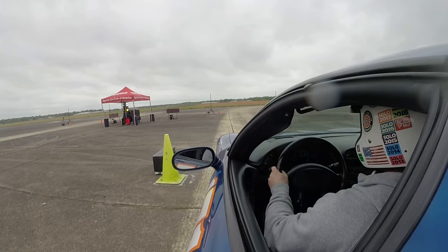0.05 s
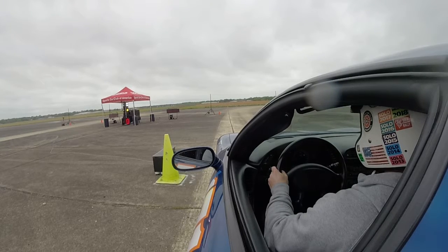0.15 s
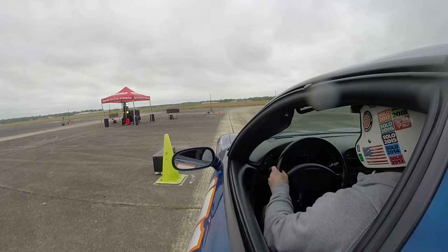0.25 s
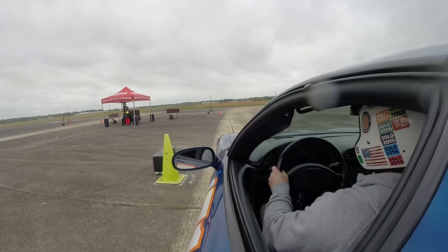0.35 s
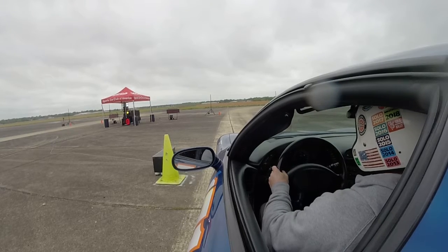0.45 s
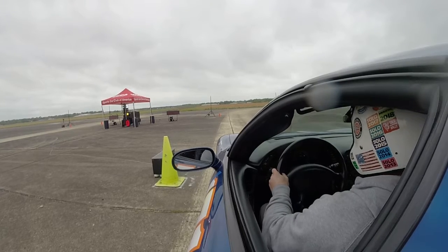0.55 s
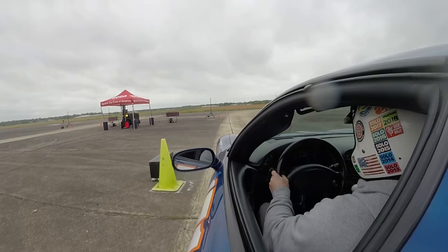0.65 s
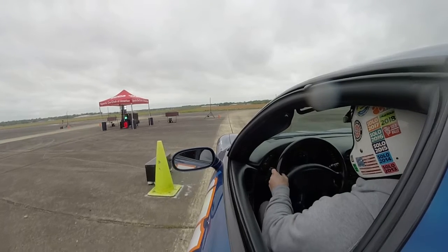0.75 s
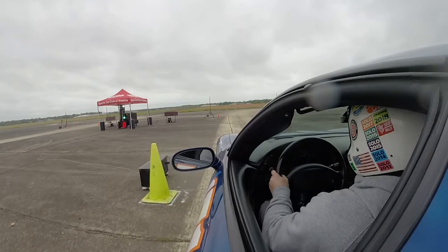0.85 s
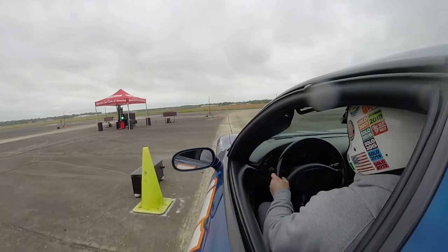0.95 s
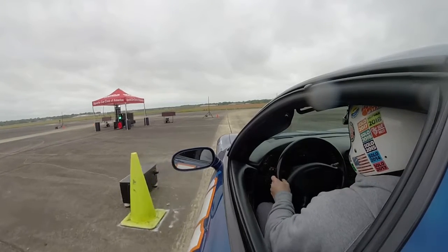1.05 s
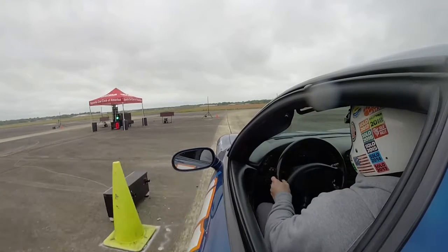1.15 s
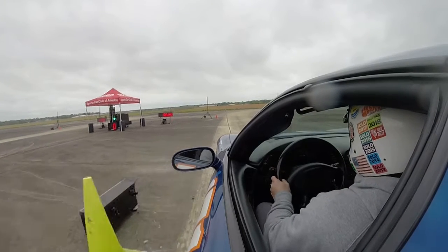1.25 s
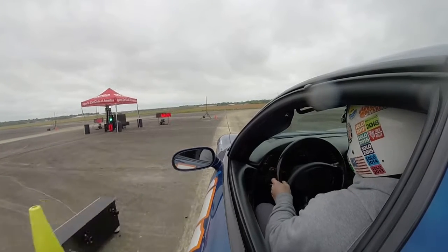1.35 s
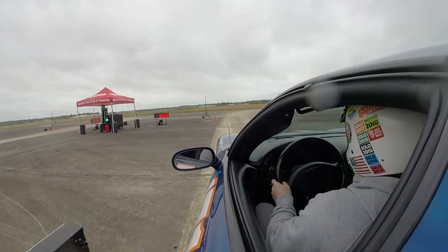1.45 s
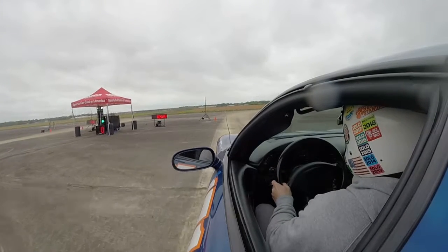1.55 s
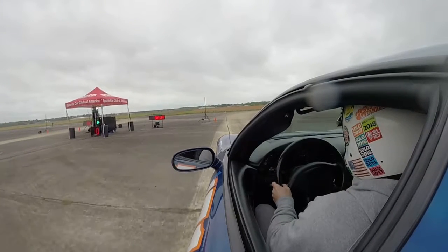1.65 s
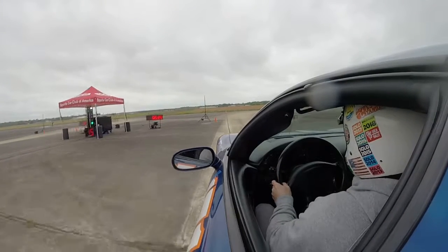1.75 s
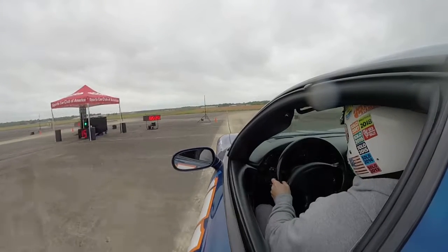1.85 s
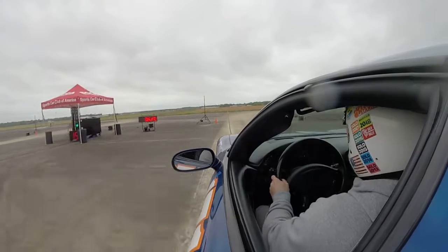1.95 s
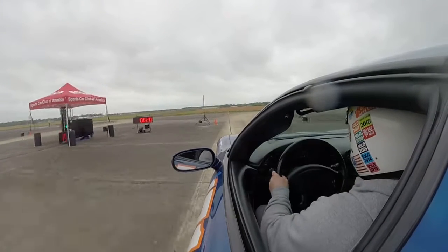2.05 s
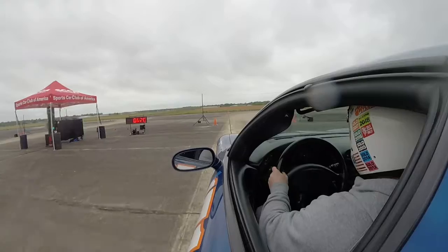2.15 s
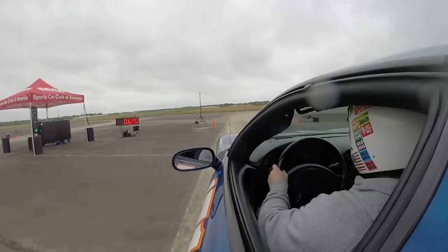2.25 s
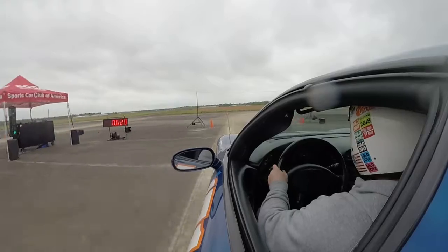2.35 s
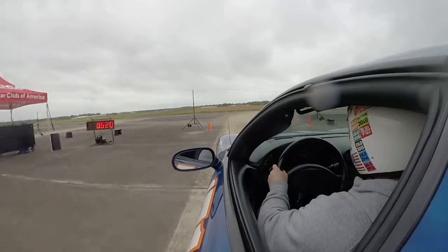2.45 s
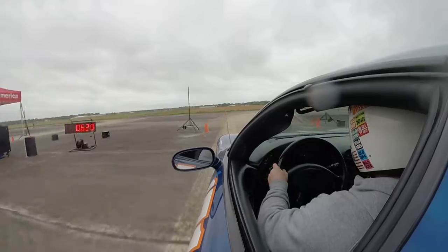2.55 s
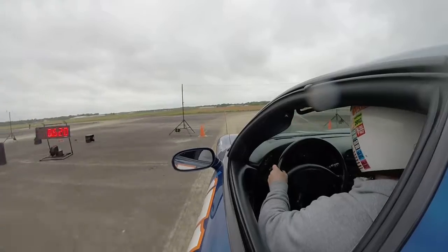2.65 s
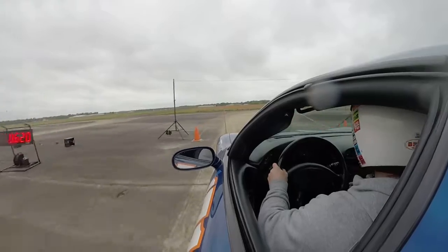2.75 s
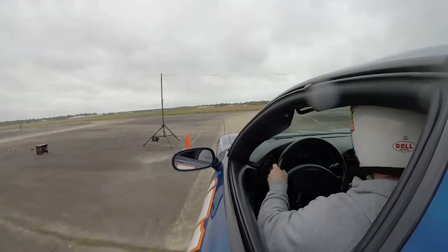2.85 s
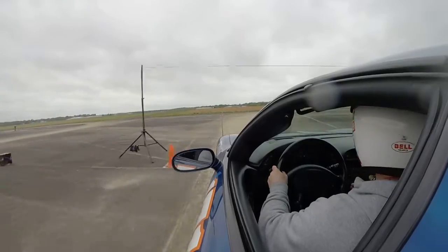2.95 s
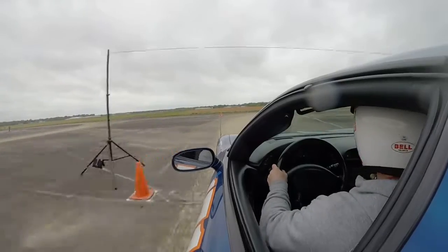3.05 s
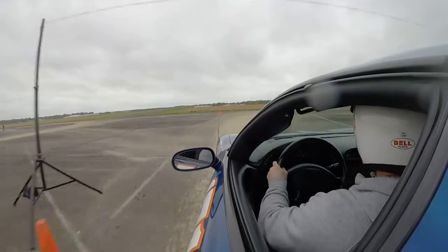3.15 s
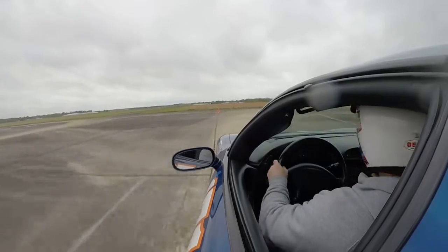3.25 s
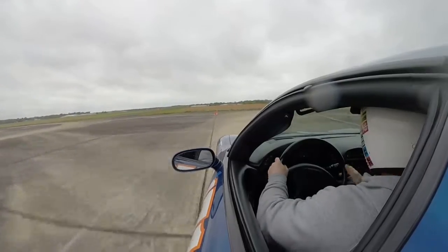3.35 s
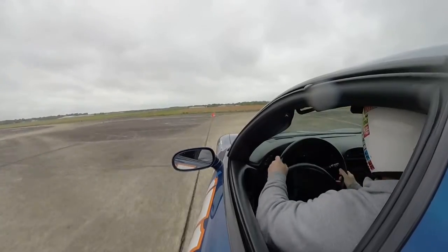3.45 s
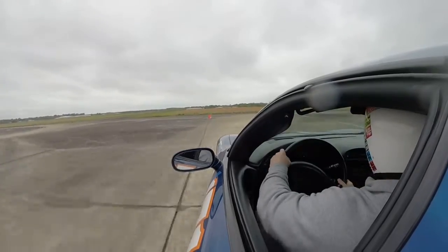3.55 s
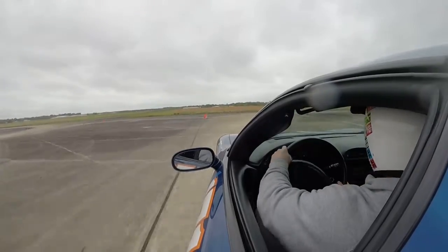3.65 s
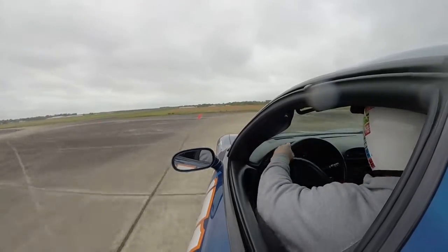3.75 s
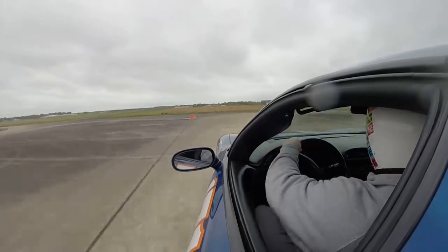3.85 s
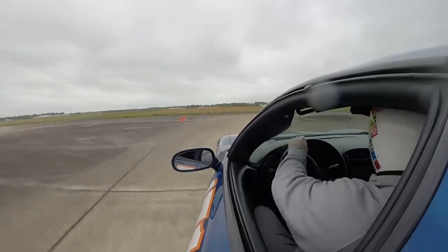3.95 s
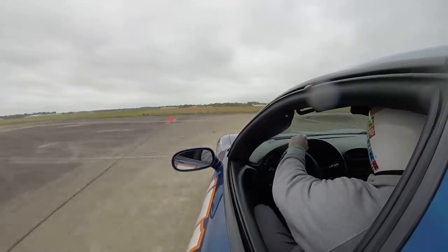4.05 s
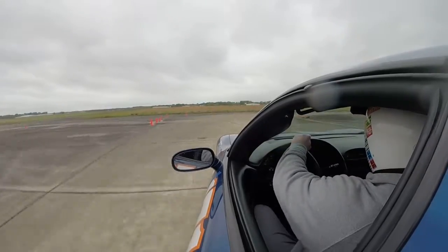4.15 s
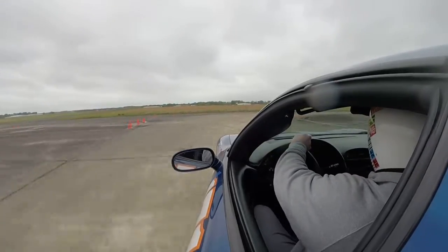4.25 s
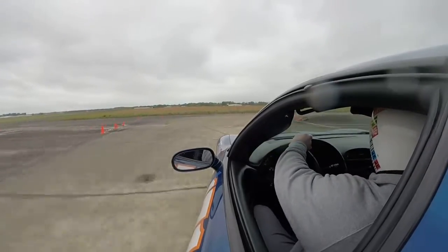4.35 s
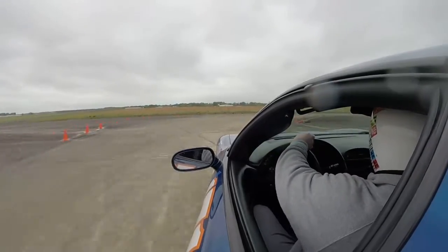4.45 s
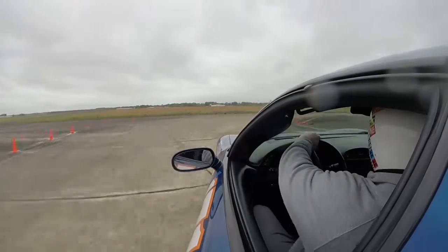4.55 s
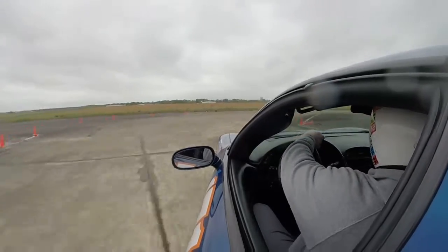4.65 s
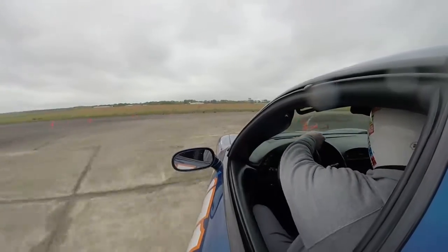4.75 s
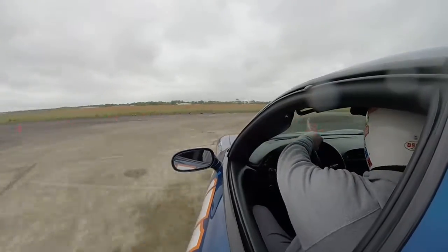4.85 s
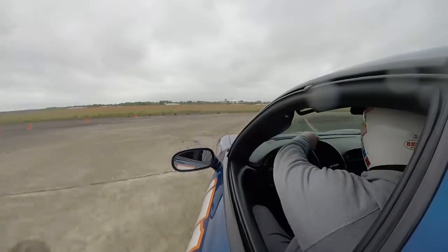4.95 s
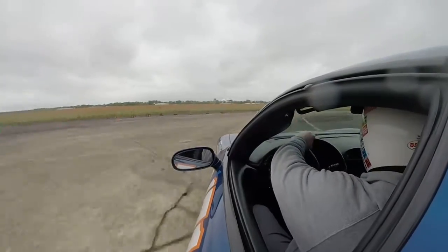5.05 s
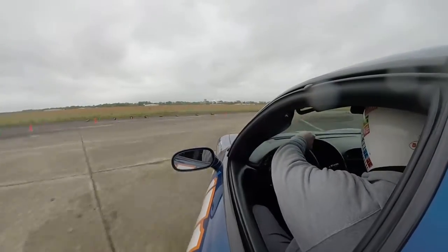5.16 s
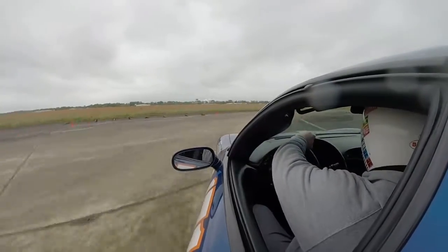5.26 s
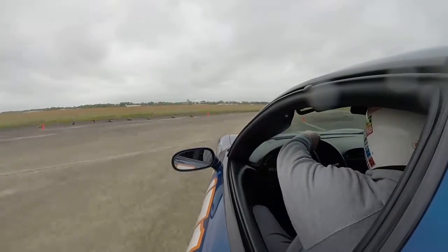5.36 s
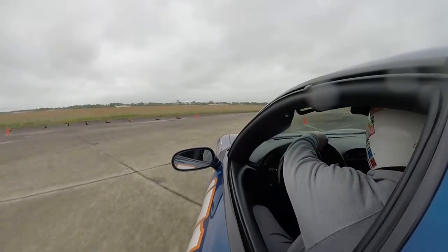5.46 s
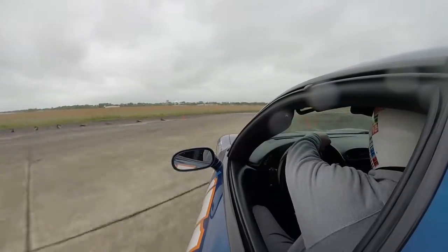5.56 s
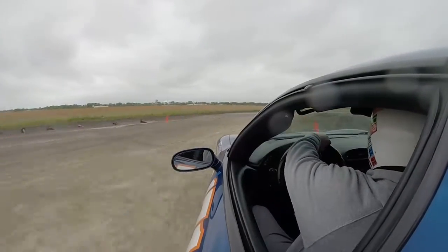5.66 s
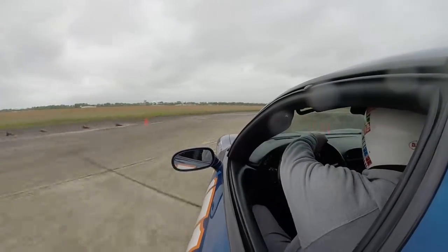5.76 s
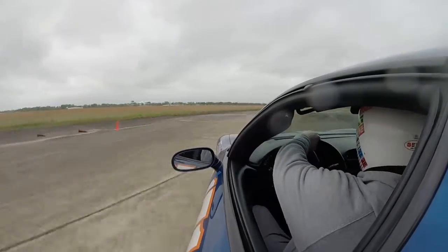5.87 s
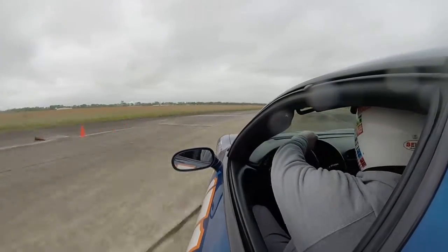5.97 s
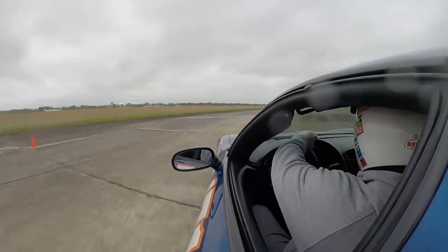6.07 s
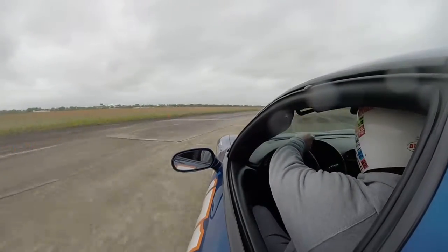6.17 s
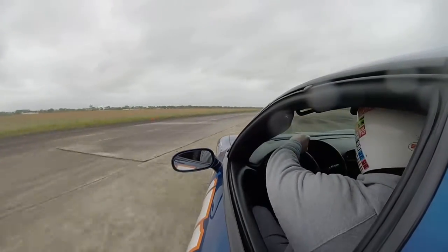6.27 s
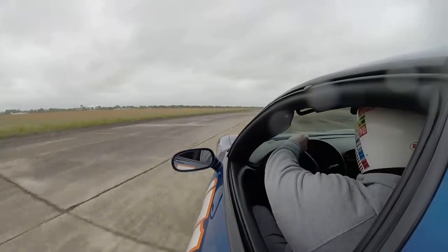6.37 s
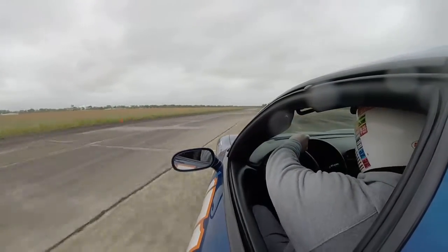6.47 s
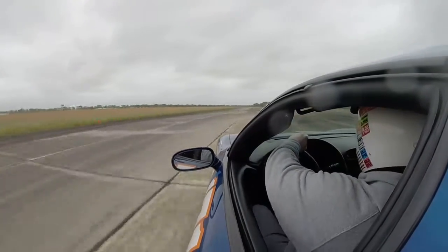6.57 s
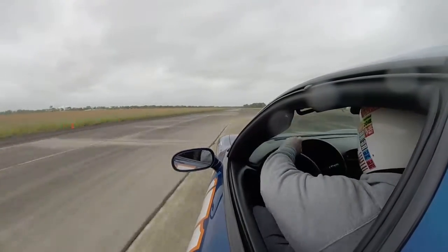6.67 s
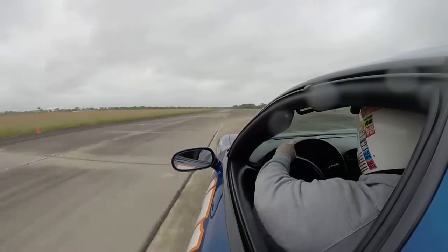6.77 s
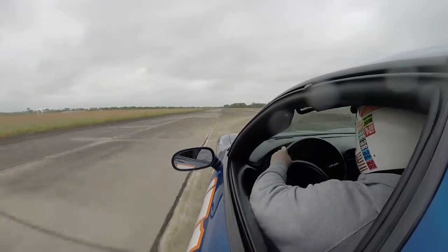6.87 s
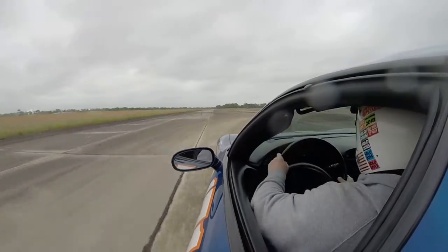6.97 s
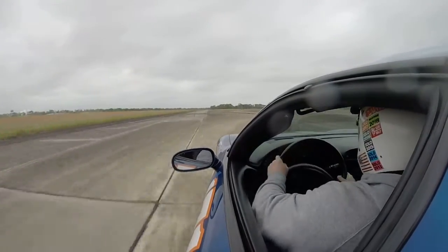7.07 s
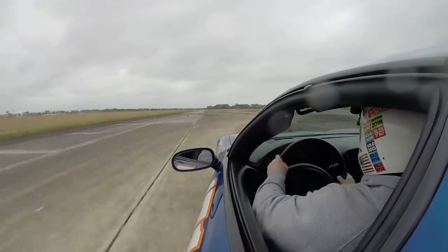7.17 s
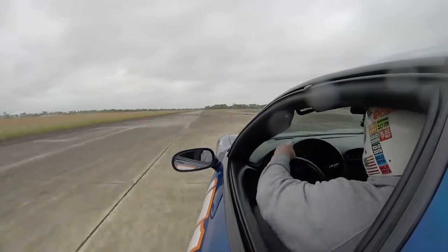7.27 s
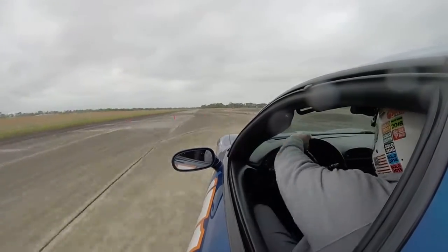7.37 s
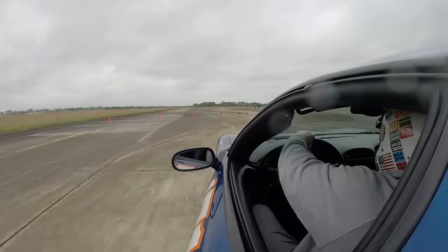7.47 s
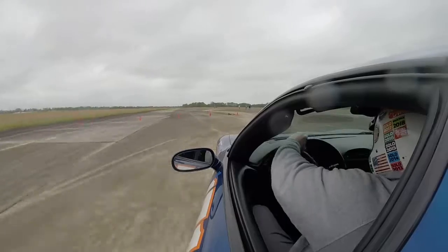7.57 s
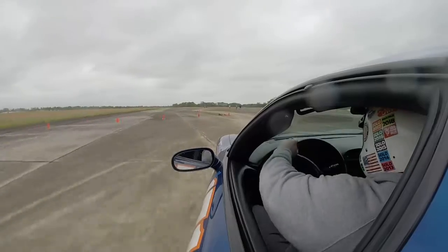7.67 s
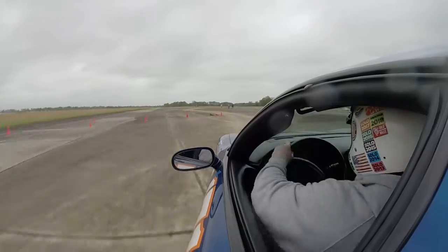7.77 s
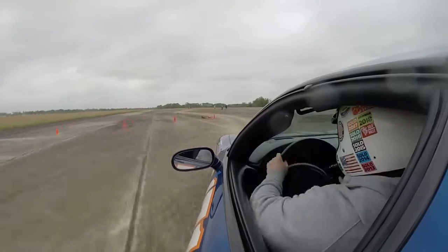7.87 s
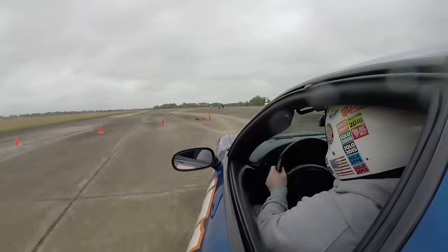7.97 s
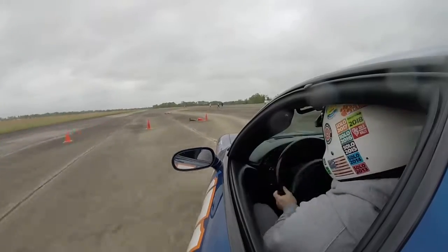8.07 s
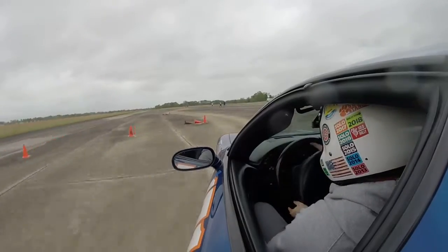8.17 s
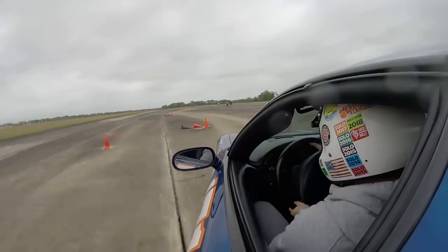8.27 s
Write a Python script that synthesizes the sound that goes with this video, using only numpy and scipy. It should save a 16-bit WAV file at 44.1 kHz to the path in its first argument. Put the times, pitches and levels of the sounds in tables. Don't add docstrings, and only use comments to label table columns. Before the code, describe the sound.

A V8 sports car holds its revs, launches with scrubbing tyres, then pulls through two gears under growing road roar and gusty wind.

```python
import sys
import numpy as np
from scipy import signal
from scipy.fft import rfft, irfft, next_fast_len
from scipy.io import wavfile
from scipy.ndimage import uniform_filter1d, map_coordinates

SR = 44100
rng = np.random.default_rng(int(sys.argv[2]) if len(sys.argv) > 2 else 0)


def waveform_to_disk(signal):
    frames = np.transpose(np.atleast_2d(signal))
    scaled = np.clip(frames, -1, 1) * 32767
    samples = np.round(scaled).astype(np.int16)
    wavfile.write(sys.argv[1], SR, samples)


def gain_from_db(level_db):
    decades = np.asarray(level_db, float) / 20
    return 10 ** decades


N = 366912
TIME = np.arange(N) / SR


def unit(x):
    return x / np.sqrt(np.mean(x ** 2) + 1e-20)


def along(points, hz):
    f, v = np.transpose(points)
    return np.interp(np.log(hz + 1), np.log(f + 1), v)


def curves(rows, outside=None):
    s, *cols = np.transpose(rows)
    return [np.interp(TIME, s, c, outside, outside) for c in cols]


def wobble(rate):
    knots = rng.standard_normal(int(N * rate / SR) + 4)
    return map_coordinates(knots, [np.arange(N) * rate / SR])


def bell(centre_s, half_s):
    return np.exp(-((TIME - centre_s) / half_s) ** 2)


def near(f, centre, wide):
    return 1 / (1 + ((f - centre) / wide) ** 2)


def filtered(x, response):
    m = next_fast_len(N + SR // 2)
    return irfft(rfft(x, m) * response(np.fft.rfftfreq(m, 1 / SR)), m)[..., :N]


def modes(peaks, f):
    return sum((-1) ** k * gain_from_db(db) * 1j * f * w / (c * c - f * f + 1j * f * w)
               for k, (c, w, db) in enumerate(peaks))


def rush(spectrum, patchy_db):
    z = signal.stft(rng.standard_normal(N), nperseg=512)[2]
    field = uniform_filter1d(rng.standard_normal(z.shape), 6, 0)
    field = uniform_filter1d(field, 10, 1)
    patchy = signal.istft(z * gain_from_db(patchy_db * unit(field)), nperseg=512)[1][:N]
    return unit(filtered(patchy, lambda hz: gain_from_db(along(spectrum, hz))))


def controls():
    # (time [s], cycle rate [Hz], exhaust note [dB], throttle effort [dB])
    idle = [(0, 21.4, -24, -42), (.46, 21.8, -24, -42)]
    first_gear = [(.56, 20.6, -25, -42), (.68, 21.5, -24, -42), (.89, 21.7, -26, -42),
                  (1.13, 26.4, -28, -47), (1.46, 22.1, -27, -50), (1.7, 20.2, -29, -47),
                  (1.92, 22.5, -32, -49), (2.02, 23.6, -46, -52), (2.2, 25.6, -42, -49),
                  (2.5, 29.3, -41, -43), (2.65, 31.5, -33, -41), (2.85, 35, -30, -36),
                  (2.95, 37.8, -45, -37), (3.12, 39.7, -48, -42), (3.28, 38.5, -50, -51)]
    second_gear = [(3.5, 30.5, -44, -51), (3.8, 31.5, -45, -45), (3.95, 33.8, -42, -42),
                   (4.2, 34.3, -42, -45), (4.8, 36, -50, -52), (5.55, 38, -46, -45), (5.9, 38.3, -52, -51),
                   (6.25, 38.5, -48, -41), (6.5, 38.7, -46, -41), (6.85, 42.7, -39, -37),
                   (7.15, 43.8, -37, -39), (7.45, 43.8, -35, -45), (7.65, 43.5, -46, -49),
                   (8.08, 42.8, -48, -49), (8.2, 41.6, -37, -46), (8.32, 41.4, -35, -46)]
    hz, note_db, effort_db = curves(idle + first_gear + second_gear)
    clutch_s, bite_s, unloaded_db = 0.42, 0.18, -21
    load = np.clip((TIME - clutch_s) / bite_s, 0, 1)
    return hz, note_db, effort_db + unloaded_db * (1 - load), load


def engine():
    # (multiple of the cycle rate, level [dB])
    free_orders = [(4.45, -41), (6, -43), (17, -53), (12, -36), (16, -54), (18, -49), (24, -52), (36, -65)]
    # (frequency [Hz], width [Hz], level [dB])
    pipe = [(107, 14, 8), (187, 12, 7), (245, 30, -1), (445, 60, 1.5)]
    uneven = {7: -3, 8: -20, 9: 1, 10: 0, 11: 3, 12: -1, 13: 3, 14: -1, 15: -1, 16: 5, 21: 3}
    whine_orders = {20: -41, 21: -42, 27: -35.5}
    # (time [s], level [dB])
    whine_swell = [
        (6.55, -14),
        (6.85, 0),
        (7.4, 0),
        (7.5, -16),
    ]
    # (frequency [Hz], density [dB per Hz])
    valves = [(1500, -26), (2600, 4), (3600, 2), (4300, -4.5), (5500, -32.5), (9500, -19.5), (10300, -63)]

    hz, firing_db, comb_db, load = controls()
    turn = 2 * np.pi * np.cumsum(hz * (1 + 0.003 * wobble(9))) / SR

    def tone(order, db, slip):
        phase = rng.uniform(0, 2 * np.pi) + slip * wobble(16)
        return np.sqrt(2) * gain_from_db(db) * np.sin(order * turn + phase)

    firing_db = firing_db + 8 * near(8 * hz, 257, 15)
    firing = tone(8, firing_db + 0.34 + 0.5 * wobble(22), slip=0.13)
    third_db = comb_db - 9 + 21 * near(6 * hz, 183, 16) + 1.2 * wobble(8.1)
    third = tone(6, third_db, slip=0.6)

    fading = np.clip(1 - (TIME - .47) / .2, 0, 1)
    free = fading * sum(tone(k, db + .8 * wobble(12), slip=.08) for k, db in free_orders)

    lug_db = 7 * bell(.85, .3)

    def colour(f):
        power = sum(gain_from_db(2 * db) * near(f, c, w) for c, w, db in pipe)
        pipe_db = 10 * np.log10(power / (1 + (f / 600) ** 8))
        return pipe_db + lug_db * near(f, 262, 40)

    comb = sum(tone(k, comb_db + colour(k * hz) + uneven.get(k, 0) + 2 * wobble(6), slip=.15)
               for k in range(4, 32))
    clatter_db = uniform_filter1d(comb_db, 9000) - 16.5 + 3.2 * np.cos(8 * turn)
    clatter = gain_from_db(clatter_db) * rush(valves, patchy_db=5.0)
    swell_db, = curves(whine_swell, outside=-120)
    whine = sum(tone(k, db + swell_db + 3 * wobble(8), slip=.4) for k, db in whine_orders.items())
    return whine + clatter + free + load * (firing + third) + comb


def mount():
    # (time [s], shaking lasts [s], swing level [dB], swing frequency [Hz])
    bumps = [(0, 0.5, -19, 31.4), (0.749, 0.042, -7, 34.4), (0.888, 0.042, -14.5, 34.6),
             (1.07, 0.14, -11, 34.63), (1.321, 0.018, -7.5, 32.23), (1.455, .01, -12, 31.5),
             (1.537, 0.62, -9, 31.42), (2.377, 0.14, -14.5, 30.04), (2.67, 0.017, -10.5, 30.7),
             (2.846, 0.25, -9.5, 30.74), (3.308, 0.047, -14.5, 31.16), (3.427, 0.19, -10, 33.06),
             (3.7, 0.027, -15, 36), (3.984, 0.024, -8, 33.7), (4.294, 0.069, -21, 36.9),
             (4.508, 0.12, -14, 34.32), (4.708, 0.076, -10.5, 34.14), (4.957, 0.13, -12.5, 33.14),
             (5.208, 0.022, -9, 33.02), (5.372, .01, -15.5, 32.9), (5.597, 0.025, -13, 30.52),
             (5.773, 0.19, -10.5, 31.57), (6.22, 0.47, -11, 32.97), (6.93, 0.094, -9.5, 31.72),
             (7.25, 0.031, -12.5, 32.02), (7.46, 0.021, -23, 31.13), (7.679, 0.038, -11, 32.1),
             (7.867, 0.035, -13, 34.57), (8.2, 0.15, -20.5, 34.4)]
    build_db_per_s, settle_db_per_s, rest_db = 164.5, 138.5, -21
    db = np.full(N, float(rest_db))
    for s, lasts, peak_db, _ in bumps:
        build = build_db_per_s * np.maximum(s - TIME, 0)
        settle = settle_db_per_s * np.maximum(TIME - s - lasts, 0)
        db = np.maximum(db, peak_db - build - settle)
    hz, = curves([(s + lasts / 2, hz) for s, lasts, _, hz in bumps])
    knocked = 0.97 * wobble(9) * (0.37 + 0.58 * controls()[3])
    swing = 2 * np.pi * np.cumsum(hz) / SR + knocked
    size = np.sqrt(2) * gain_from_db(uniform_filter1d(db, 500) + 2.5 * wobble(25))
    return size * (np.sin(swing) + 0.16 * size * np.cos(2 * swing + 1.4))


def buffeting(cruise_over_db, surface_db, parked):
    # (frequency [Hz], density [dB per Hz])
    spectrum = [(15, 3), (24, -2.5), (45, 8), (62, 0.5), (100, 2.5), (140, -12), (200, -6), (330, -20),
                (600, -71.5)]
    db = -23 + 0.68 * cruise_over_db - 9.5 * parked + .5 * surface_db
    return gain_from_db(db + 2.5 + 0.82 * wobble(17)) * rush(spectrum, patchy_db=-0.5)


def drumming(cruise_over_db, surface_db, parked):
    # (frequency [Hz], width [Hz], level [dB])
    panels = [(109.7, 9, -1), (183.8, 28, -4), (219, 12, -2.5), (258, 50, -8), (368, 14, -10),
              (450, 34, -8.5), (506, 230, -25.5)]
    effort_over_db = controls()[2] + 46
    db = -28.5 + .39 * cruise_over_db + .16 * effort_over_db + .7 * wobble(5)
    db = db + 0 * bell(1, 0.28)
    db = db + surface_db - 4 * parked
    force = gain_from_db(0.73 * wobble(8.9)) * rng.standard_normal(N)
    return gain_from_db(db) * unit(filtered(force, lambda f: modes(panels, f) / (1 + (f / 700) ** 4)))


def tyre_roar(roar_db, surface_db, lull_db, gust, slow):
    # (frequency [Hz], density [dB per Hz])
    spectrum = [(180, 7), (300, -6.5), (459, -2.5), (580, -1), (902, 3), (1620, 2), (1910, -4),
                (2200, -12.5), (2860, -33.5), (4840, -120)]
    roar = gain_from_db(roar_db + 0.5 + 0.5 * gust + 0.32 * lull_db) * rush(spectrum, patchy_db=1.0)
    roar = roar - slow * filtered(roar, lambda f: 1 / (1 + (1250 / (f + 1)) ** 8))
    ring = unit(filtered(rng.standard_normal(N), lambda f: modes([(191.0, 17.7, 0)], f) ** 2))
    return roar + gain_from_db(surface_db + roar_db - 7.5 - 16 * slow) * ring


def wind(hiss_db, lull_db, gust, parked, swing):
    # (frequency [Hz], density [dB per Hz])
    hiss_spectrum = [(1200, -16.5), (2000, -4), (3300, -6), (4000, -10), (4350, -17.5), (4700, -11),
                     (6000, -13.5), (7200, -21), (9000, -32.5), (12000, -67.5)]
    whistle_spectrum = [(5000, -48), (7500, -6), (9800, -4.5), (11000, -1.5), (12500, -1), (16000, -9.5)]
    puffs_db = 1.3 * bell(2.5, 2.0) * wobble(28.0)
    wind_db = hiss_db + .5 - 2 * parked + 0.78 * lull_db + puffs_db
    wind_db = wind_db + 0.33 * gust + 0.71 * wobble(150) - 3 * swing
    hiss = gain_from_db(wind_db - 3.5) * rush(hiss_spectrum, patchy_db=0.28)
    whistle_db = 1.16 * (wind_db + 37.5) - 53.5 + 0.74 * wobble(20)
    whistle = gain_from_db(whistle_db) * rush(whistle_spectrum, patchy_db=-0.5)
    grains = (rng.random(N) < 250 / SR) * rng.choice([-1, 1], N)
    grains = grains * gain_from_db(8.4 * np.clip(rng.standard_normal(N), -2, 2))
    grit = unit(filtered(grains, lambda f: gain_from_db(along(hiss_spectrum, f)) * (f / 5000)))
    return hiss + whistle + gain_from_db(hiss_db + lull_db - 16.5) * grit


def flow(swing):
    # (time [s], road level [dB], wind level [dB])
    speed = [(0, -48, -61.5), (.55, -39.5, -64.5), (.85, -29, -47.5), (1.02, -25.5, -45.5),
             (1.3, -33, -53.5), (2.1, -35, -52.5), (2.83, -26.5, -43), (3.24, -30.5, -40),
             (3.82, -26.5, -36), (4.19, -27, -34), (4.45, -24, -31), (4.7, -25.5, -32), (5.3, -26, -33.5),
             (6.05, -23.5, -29), (6.5, -25, -32), (7.2, -25, -32), (7.8, -23, -28.5), (8.32, -23, -30)]
    # (time [s], level [dB])
    surface = [
        (4.7, 1.5),
        (4.95, -3),
        (5.4, -4.5),
        (5.6, -1),
        (5.95, -4),
        (6.15, 0),
        (6.45, -3),
        (6.7, -2),
    ]
    # (time [s], depth [dB], half length [s])
    lulls = [(1.562, -5.5, 0.01), (1.654, -7, 0.024), (1.936, -7, 0.044), (1.99, -7, 0.0096),
             (2.141, -12, 0.0087), (2.162, -4, 0.0078), (2.193, -2, 0.0086), (2.298, -5, 0.012),
             (2.352, -20, 0.014), (2.413, -18, 0.0041), (2.44, -13, 0.012), (2.488, -14, 0.01),
             (2.585, -9, 0.0094), (2.647, -10, 0.021), (2.755, -10, 0.007), (2.785, -7, 0.011),
             (2.873, -12, 0.011), (2.984, -11, 0.0093), (3.017, -12, 0.0087), (3.064, -13, 0.0044),
             (3.221, -5, 0.012), (3.459, -10, 0.005), (3.484, -11, 0.01), (3.565, -3, 0.0078),
             (3.898, -7, 0.0086), (4.035, -10, 0.0092), (4.077, -4, 0.0084), (4.288, -7, 0.0089),
             (4.54, -2, 0.0091), (4.75, -7.5, 0.003), (4.787, -3.5, 0.028), (4.992, -3, 0.028),
             (5.247, -4, 0.01), (5.872, -1, 0.0099), (6.015, -4.5, 0.017), (6.516, -9, 0.0085),
             (6.695, -3, 0.017), (6.76, 1, 0.009), (6.84, -6, 0.0077), (6.858, 2.5, 0.021),
             (7.077, -4, 0.016), (7.297, -10, 0.011), (7.374, -6, 0.007), (7.44, -2, 0.0036),
             (7.599, -3, 0.0076), (7.657, -11, 0.007), (7.686, -5, 0.0057), (8.015, -4.5, 0.011),
             (8.084, -5, 0.009), (8.218, -1, 0.008)]
    roar_db, hiss_db = curves(speed)
    surface_db, = curves(surface, outside=0)
    lull_db = sum(db * bell(s, half) for s, db, half in lulls)
    gust = wobble(14) + 1.46 * wobble(45)
    parked = 1 - controls()[3]
    slow = np.clip((-28.5 - hiss_db) / 25, 0, .7)
    cruise_over_db = roar_db + 26
    body = buffeting(cruise_over_db, surface_db, parked) + drumming(cruise_over_db, surface_db, parked)
    road = tyre_roar(roar_db, surface_db, lull_db, gust, slow)
    return body + road + wind(hiss_db, lull_db, gust, parked, swing)


def tyres():
    # (time [s], level [dB])
    scrub = [
        (.46, -52),
        (.53, -43),
        (.57, -35.5),
        (.825, -30),
        (.845, -22),
        (1.17, -25),
        (1.19, -29),
        (1.38, -30.5),
        (1.56, -36),
        (2.14, -53),
    ]
    # (time [s], lift [dB])
    grabs = [
        (.838, 3),
        (.892, 5),
        (.955, 4),
        (1.035, 4),
        (1.085, 4),
        (1.14, 6),
        (1.197, 11),
        (1.245, 11),
        (1.308, 8),
        (1.338, 3),
    ]
    # (frequency [Hz], width [Hz], level [dB])
    tread = [(455, 89, -14.5), (867, 153, -8.5), (1062, 80, -2.5), (1660, 180, -21), (3670, 330, -34.5),
             (6500, 900, -49.5), (9500, 900, -32)]
    launch_db, = curves(scrub, outside=-120)
    grab_s, grab_rise_s = 0.02, .004
    for s, db in grabs:
        launch_db = launch_db + db * np.exp(-np.abs(TIME - s) / grab_s) * np.clip((TIME - s) / grab_rise_s, 0, 1)
    left = (2.863 - TIME) / 0.52
    again = gain_from_db(-29 - 15 * np.abs(left)) * (left > 0) * (left < 1.3)
    slips = gain_from_db(1.3 * wobble(110) + 0.4 * wobble(41)) * rng.standard_normal(N)
    scrubbing = unit(filtered(slips, lambda f: modes(tread, f) / (1 + (f / 5000) ** 4)))
    return (gain_from_db(launch_db - 1.0) + again) * scrubbing


def knocks():
    # (time [s], peak [dB], frequency [Hz], 60 dB decay [s])
    blows = [(.536, -19.5, 1170, .073), (1.76, -23, 1850, .03), (1.761, -35, 3530, .028),
             (4.496, -4.5, 173, .087), (5.98, -18, 185, .6), (.7, -14, 85.4, .25), (2.101, -4, 70, .19),
             (3.84, -21, 441.8, 1.2), (5.5, -17, 194.1, 1.5), (4.3, -27, 355, 1.5),
             (2.1112, -18, 920, .012), (.679, -38, 2380, .03), (2.148, -27, 1400, .03),
             (1.04, -36, 2300, .05), (2, -14, 70, .25), (2.3, -15, 72, .2), (7.35, -19, 182, .5),
             (3.7, -21, 187, .6), (6.9, -9, 100, .2), (6.62, -14, 95, .16), (2.98, -27, 1000, .12),
             (6.64, -28, 880, .3)]
    out, t = np.zeros(N + SR), np.arange(SR // 4) / SR
    for s, db, hz, t60 in blows:
        rise = 1 - np.exp(-t / max(2 / hz, t60 / 20))
        close = (1 - (t / t[-1]) ** 2) ** 2
        out[round(s * SR):][:len(t)] += gain_from_db(db - 60 * t / t60) * rise * close * np.sin(2 * np.pi * hz * t)
    return out[:N]


def shudder():
    # (frequency [Hz], level [dB])
    pitches = [(111, -33), (218, -37), (366, -43), (437, -46)]
    # (time [s], level [dB])
    swell = [
        (.55, -25),
        (.9, 0),
        (1.08, 1),
        (1.25, -7),
        (1.5, 0),
        (2.05, -2),
        (2.4, -8),
        (2.7, -30),
    ]
    swell_db, = curves(swell, outside=-120)
    out = np.zeros(N)
    for hz, db in pitches:
        size = np.sqrt(2) * gain_from_db(db + swell_db + 2.5 * wobble(5))
        out += size * np.sin(2 * np.pi * hz * TIME + .9 * wobble(7))
    return out


def rattles():
    # (time [s], tap [dB], bright edge [dB], dull ring [dB])
    rebounding = [(.6785, -33.5, -54, -47), (1.5726, -42, -58, -53), (1.794, -60, -52, -60),
                  (1.825, -40, -63, -50), (1.8344, -29.5, -42, -56), (1.864, -46, -71, -58.5),
                  (1.8703, -37, -48, -39), (1.945, -57, -64, -57), (1.964, -35.5, -47, -43),
                  (1.999, -39, -56, -41), (2.122, -44, -58, -37), (2.1395, -41, -53, -53),
                  (2.1463, -35, -35, -24.5), (2.178, -39, -47, -36), (2.462, -53, -74, -55),
                  (2.506, -50, -54, -35), (2.6615, -53, -70, -53), (2.721, -44, -70, -52),
                  (2.87, -37, -52, -26), (2.901, -43, -62, -55), (2.963, -47, -60, -52),
                  (2.9958, -36, -40, -47), (3.058, -44, -58, -50), (3.446, -44, -50, -50)]
    snaps = [
        (2.875, -36, -26, -32),
        (3.4812, -38, -25.5, -45),
        (3.503, -44, -48, -44),
        (3.911, -34, -44, -40),
        (4.0294, -42, -42, -40),
        (1.108, -44, -53, -54),
        (2.367, -54, -66, -47),
        (2.824, -42, -51, -50),
        (2.9318, -49, -55, -50),
        (3.028, -46, -54, -50),
    ]
    rebound = np.array([.0043, -10, -2, -16])
    hits = [np.array(row) + k * rebound for row in rebounding for k in range(3)]
    out, t = np.zeros(N + SR), np.arange(SR // 4) / SR

    def band(lo_hz, hi_hz):
        sos = signal.butter(2, [lo_hz, hi_hz], "band", fs=SR, output="sos")
        return unit(signal.sosfilt(sos, rng.standard_normal(len(t))))

    def shape(life, lag=0):
        age = np.maximum(t - lag, 0) / life
        return (age * np.exp(1 - age)) ** 2

    for s, tap_db, edge_db, dull_db in hits + snaps:
        tap = gain_from_db(tap_db - 6.5) * band(2400, 7000) * shape(0.0011)
        edge = gain_from_db(edge_db - 1.5) * band(9300, 15000) * shape(0.00054)
        ring = 0.99 * np.sin(2 * np.pi * rng.normal(1850, 80) * t) + 0.47 * band(1100, 2400)
        dull = gain_from_db(dull_db) * ring * shape(0.001, lag=.0012)
        out[round(s * SR):][:len(t)] += tap + edge + dull
    return out[:N]


def ducking():
    # (time [s], depth [dB], recovery [s])
    ducks = [
        (2.158, -6.5, 0.18),
        (2.881, -13.5, 0.083),
        (3.489, -5, 0.12),
        (4.04, -3, 0.092),
        (4.725, -5.5, 0.055),
        (4.74, 2, 0.099),
        (4.752, -7, 0.12),
    ]
    gain_db = np.zeros(N)
    for s, db, back in ducks:
        gain_db += db * np.clip((TIME - s) / 0.0022, 0, 1) * np.exp(-np.abs(TIME - s) / back)
    return gain_from_db(gain_db)


def scene():
    # (frequency [Hz], density [dB per Hz])
    floor = [(2000, -21), (6000, -2), (11500, 1), (13200, -10), (14500, -38.5)]
    swing = mount()
    car = ducking() * (engine() + shudder() + flow(swing) + tyres())
    hiss = gain_from_db(-73) * rush(floor, patchy_db=3.0)
    return (swing + car + knocks() + rattles() + hiss)[None]


def band_limit(x):
    return signal.sosfilt(signal.butter(12, 15140, fs=SR, output="sos"), x)


def record(dry):
    # (frequency [Hz], width [Hz], lift [dB])
    case = [(2394, 277, 8.5), (5000, 710, 7), (6430, 210, -4.5), (11000, 490, -6.5)]
    # (frequency [Hz], level [dB])
    mic = [(20, 0), (7000, 0.33), (11500, -6.5), (12500, -12.5), (14000, -14.5), (15100, -20), (15600, -58)]

    def lift(f):
        return 1 + sum(gain_from_db(db) * (f * w) ** 2 / ((c * c - f * f) ** 2 + (f * w) ** 2) for c, w, db in case)

    rounded = dry / (1 + np.abs(dry / .88) ** 5) ** (1 / 5)
    mix = filtered(rounded, lambda f: lift(f) * gain_from_db(along(mic, f)))
    return band_limit(mix)


dry = scene()
out = record(dry)
waveform_to_disk(out)
```